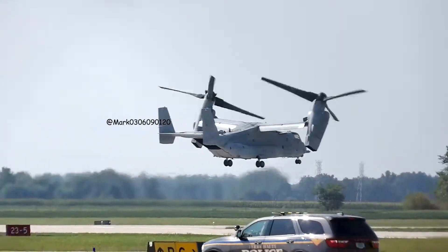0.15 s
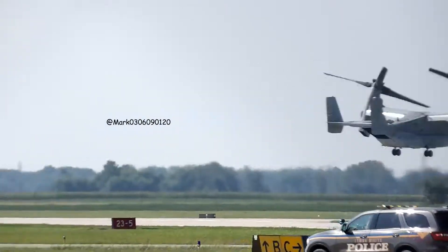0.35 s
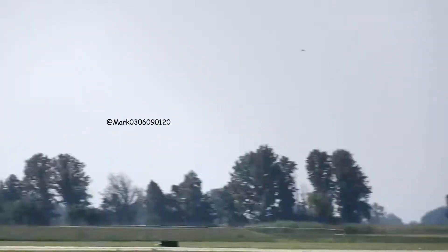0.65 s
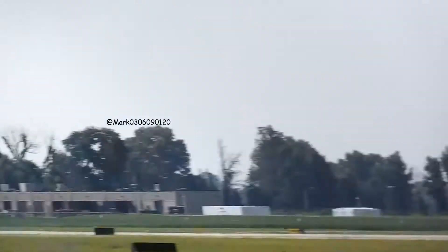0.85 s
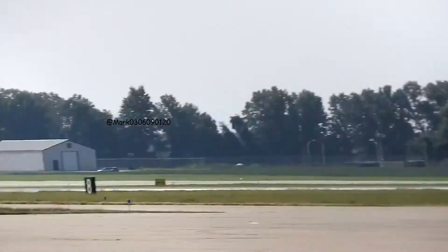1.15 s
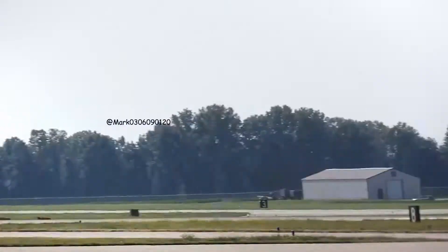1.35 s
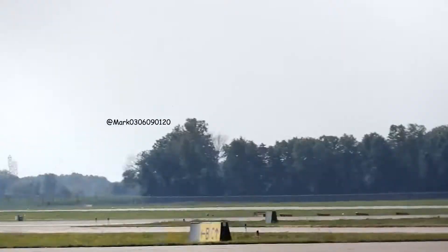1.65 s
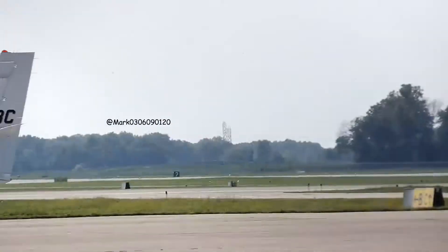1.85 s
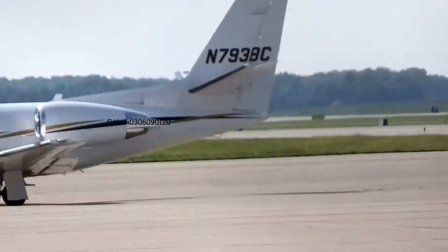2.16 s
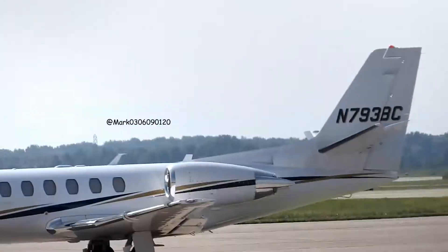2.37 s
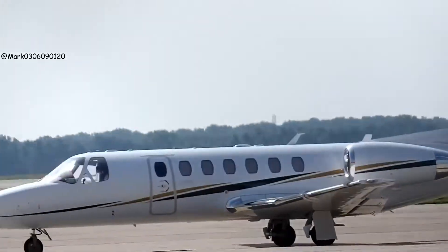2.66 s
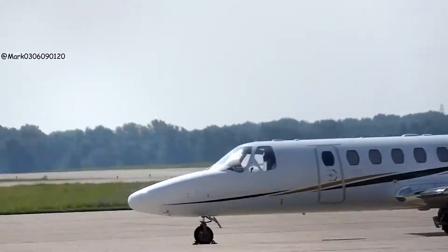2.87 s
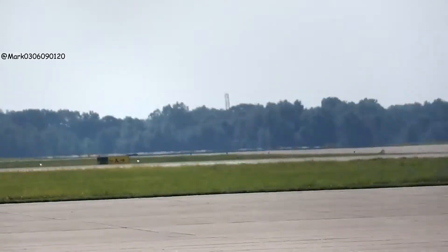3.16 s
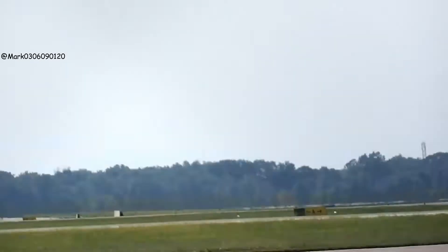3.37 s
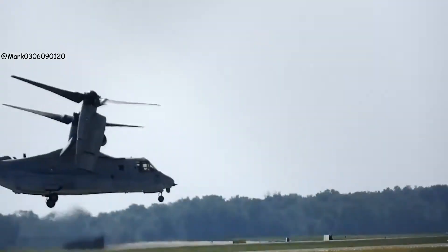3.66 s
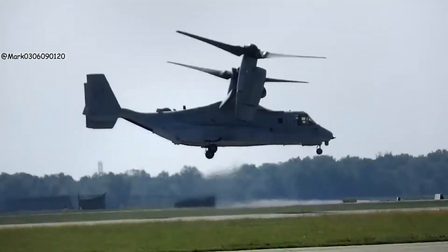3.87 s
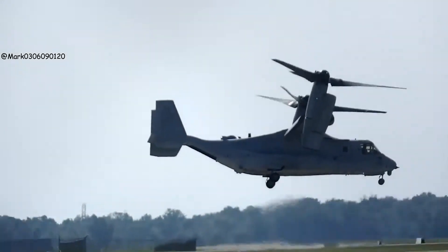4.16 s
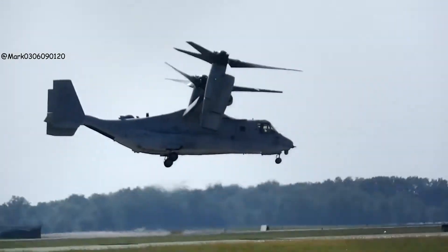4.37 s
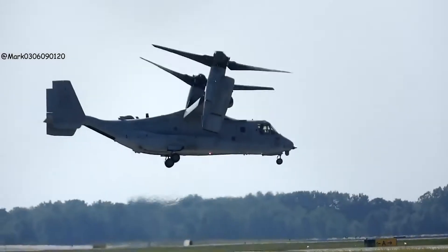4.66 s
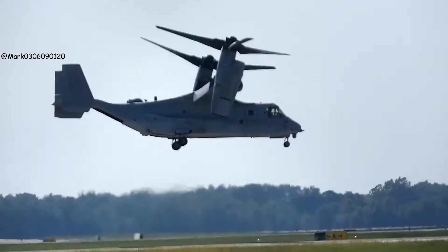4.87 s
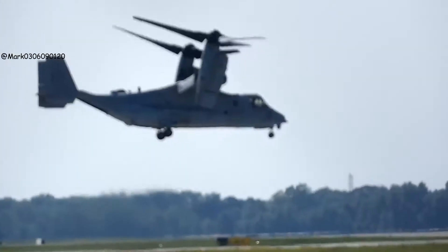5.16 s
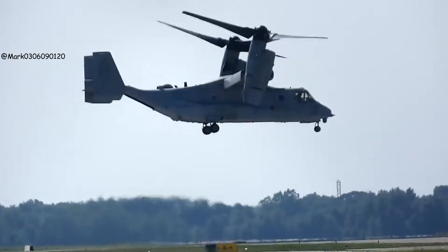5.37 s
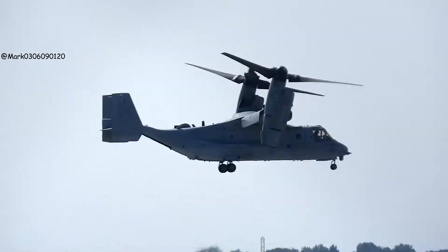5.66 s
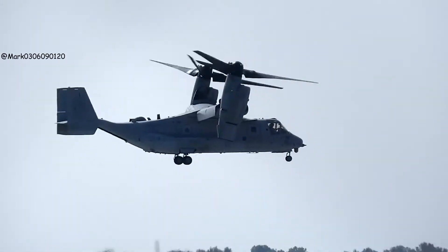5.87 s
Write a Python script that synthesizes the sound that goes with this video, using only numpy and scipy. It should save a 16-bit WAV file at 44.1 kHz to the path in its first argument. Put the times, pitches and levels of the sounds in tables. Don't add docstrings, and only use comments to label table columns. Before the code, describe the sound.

Wind buffets an open microphone, then a large tiltrotor's roar builds into hard, overloading blade slaps before easing to a steadier rushing roar.

```python
import sys
import numpy as np
from scipy import signal
from scipy.fft import rfft, irfft
from scipy.io import wavfile
from scipy.ndimage import uniform_filter1d

SR = 44100
rng = np.random.default_rng(int(sys.argv[2]) if len(sys.argv) > 2 else 0)


def store_wav(level_fs):
    pcm = np.round(np.clip(np.atleast_2d(level_fs), -1, 1) * 32767)
    wavfile.write(sys.argv[1], SR, pcm.T.astype(np.int16))


def natural_amplitude(level_db):
    exponent = np.asarray(level_db, float) / 20
    return 10 ** exponent


N = 265482
TIME = np.arange(N) / SR
FREQ = np.fft.rfftfreq(N, 1 / SR) + 1


def aircraft():
    # [t/s, low roar/dB, bright rush minus roar/dB, throb depth 0-1]
    flight = [(0.0, -31, -11.5, 0), (0.3, -37.5, -12.5, 0.1), (0.65, -32.5, -16, 0.7), (1, -35.5, -13, 0.2),
              (1.352, -37, -14, 0), (1.601, -33.5, -14.5, 0.2), (1.851, -36.5, -10.5, 0.5),
              (2.148, -32, -12.5, 0.6), (2.599, -32.5, -7.5, 0.23), (2.999, -30, -12, 0.75),
              (3.403, -27.5, -11, 0.5), (3.749, -28.5, -4.5, 0.8), (4.101, -32, -3.5, 0.4),
              (4.352, -29.5, -8, 0.3), (4.6, -34, -2.5, 0.8), (5.049, -27.5, -8.5, 0),
              (5.551, -29.5, -7, 0.21), (6.02, -32, -6, 0.1)]
    # [t/s, thump/dB, crack/dB]
    slaps = [(0.443, -34, -35.5), (0.573, -16.5, -61), (0.667, -25, -46), (1.51, -42, -32.5),
             (1.949, -25.5, -40), (1.997, -22, -40), (2.203, -33.5, -30.5), (2.497, -42, -27),
             (2.592, -22.5, -25), (2.925, -31.5, -28.5), (3.3105, -15.5, -19), (3.359, -6.5, -18.5),
             (3.409, -9.5, -17), (3.459, -11, -23.5), (3.509, -11.5, -13.5), (3.624, -19.5, -21),
             (3.673, -14, -24.5), (3.7205, -18.5, -18), (3.768, -25, -19.5), (3.816, -17, -23.5),
             (3.863, -14.5, -19), (3.915, -17.5, -22.5), (3.961, -32.5, -23.5), (4.141, -12, -27.5),
             (4.287, -11, -33.5), (4.338, -15, -36), (4.435, -16.5, -39), (4.828, -20.5, -22.5),
             (4.881, -18, -26.5), (5.022, -18, -60), (2.044, -27, -38), (2.098, -23, -43),
             (2.148, -29.5, -32.5), (2.29, -20.5, -48), (2.341, -20, -46), (2.392, -20, -47.5),
             (2.442, -39.5, -35), (2.642, -23, -31.5), (2.978, -18, -43), (3.025, -28, -44),
             (3.112, -18.5, -40.5), (3.17, -19, -39), (3.223, -32.5, -29.5), (3.262, -21.5, -34.5),
             (3.558, -28, -29.5), (4.012, -19.5, -27), (4.048, -17.5, -29.5), (4.095, -24, -29),
             (4.191, -13.5, -33), (4.239, -18.5, -36.5), (4.39, -23.5, -38), (4.572, -28, -32.5)]
    # [t/s, thump/dB, crack/dB]
    far_slaps = [(2.853, -20, -40), (2.908, -21.5, -42.5), (3.062, -19, -34), (3.131, -21, -31),
                 (3.576, -24, -28.5), (4.065, -25.5, -27.5), (4.31, -19, -33.5), (4.408, -19, -39),
                 (3.3545, -13, -14), (3.4145, -18, -31), (3.4775, -24, -37), (3.502, -23.5, -19.5),
                 (3.608, -14.5, -32.5), (3.619, -22, -20.5), (3.63, -11.5, -34.5), (3.709, -23, -33),
                 (3.757, -22, -24.5), (3.852, -19.5, -36)]
    # [t/s, level/dB]
    intake_whine = [
        (0, -70.5),
        (1, -70.5),
        (1.8, -67.5),
        (2.5, -64.5),
        (3.2, -63),
        (3.8, -63),
        (4.5, -63),
        (5.3, -64),
        (6.02, -65.5),
    ]
    # [f/Hz, density/dB per Hz]
    colour = [(100, -50), (260, -9.5), (400, -8), (445, -3.5), (520, -8.5), (620, -2.5), (700, 0.5),
              (820, -2.5), (950, -5.5), (1500, -7), (2100, -4), (2600, -4), (3100, -15), (4600, -29),
              (5300, -38), (7300, -41.5), (8500, -48)]
    exhaust_db, exhaust_follows, usual_rush_db = -45, 0.45, -42
    first_exhaust_db, first_gone_s = 3, 1
    flicker_db = 0.7

    s, *columns = np.transpose(flight)
    roar_db, rush_db, depth = (np.interp(TIME, s, column) for column in columns)
    rush_db = roar_db + rush_db
    depth = np.clip(depth, 0, 1)
    near_slaps = sorted(slaps)
    turns = blade_turns(np.transpose(near_slaps)[0])
    when, thump_db, crack_db = np.vstack([near_slaps, far_slaps]).T

    passes = natural_amplitude(2 * rng.standard_normal((200, 2)))[np.floor(turns).astype(int)].T
    phase = turns % 1
    beat = 2.86 * (1 - np.exp(-(phase / 0.16) ** 2)) * np.exp(-phase / 0.14)

    roar = natural_amplitude(roar_db + 7.5 + flicker_db * walk(7.3) + 0.18 * walk(59))
    roar = roar * (1 + 2.16 * (depth + 0.063) * beat * passes[0])
    roar = np.hypot(roar, bursts(when + 0.00071, thump_db + 2.0, rise_ms=1.7, fall_ms=4.9))

    rush = natural_amplitude(rush_db + 12.5 + 0.31 * flicker_db * walk(8) + 0.89 * walk(60))
    rush = rush * (1 + 1.35 * (depth + 0.17) * beat * passes[1])
    rush = np.hypot(rush, bursts(when, crack_db + 12.5, rise_ms=1.4, fall_ms=1.2))

    hiss_db = exhaust_db + exhaust_follows * (rush_db - usual_rush_db)
    hiss_db = hiss_db + first_exhaust_db * np.clip(1 - (TIME / first_gone_s) ** 2, 0, 1)
    intake_db = np.interp(TIME, *np.transpose(intake_whine))
    hiss, intake = (natural_amplitude(db + 9.0 + 0.89 * walk(24)) * (1 + 2.2 * depth * beat) for db in (hiss_db, intake_db))
    hiss = np.hypot(hiss, bursts(when, crack_db + 0.5, rise_ms=1.3, fall_ms=1.5))

    levels = roar, rush, hiss, intake
    bands = parts(colour)
    direct, scattered = (sum(shape(level * noise, band) for level, noise, band in zip(levels, noises, bands))
                         for noises in rng.standard_normal((2, 4, N)))
    direct = direct + slap_rings(when, thump_db, crack_db)
    thud = unit(np.exp(-(np.log(FREQ / 240) / 0.45) ** 2))
    direct = direct + shape(natural_amplitude(roar_db - 2) * beat * passes[0] * rng.standard_normal(N), thud)

    push = bursts(when, 1.68 * thump_db - 19.5, rise_ms=4.1, fall_ms=4.1)
    right = direct + shape(push, FREQ / (FREQ + 15))
    return np.array([body_shadow(direct, scattered), right])


def blade_turns(when):
    blade_hz = 20.3
    passed = np.cumsum(np.maximum(np.round(blade_hz * np.diff(when, prepend=0)), 1))
    return blade_hz * TIME + 2 + np.interp(TIME, when, passed - blade_hz * when) + 0.21


def slap_rings(when, thump_db, crack_db):
    low = chirps(when - 0.0026, thump_db + 4.5, 1342, 718, sink_ms=1.54, rise_ms=3.0, hold_ms=8.0)
    high = chirps(when - 0.0019, crack_db + 9.0, 2650, 2000, sink_ms=1.95, rise_ms=2.1, hold_ms=3.5)
    edge = chirps(when - 0.0015, 1.88 * crack_db + 11.0, 5470, 3600, sink_ms=1.3, rise_ms=0.53, hold_ms=1.3)
    return low + high + edge


def body_shadow(direct, scattered):
    # [f/Hz, level/dB, phase/rad, likeness 0-1]
    left_port = [(100.0, 11.5, 0.6, 0.01), (168, -2, -1, 0.3), (272, -4.5, -0.57, 1),
                 (430, -7.5, -0.94, 0.95), (680, -9, -0.72, 0.89), (920, -13, -2.3, .95),
                 (1140, -12, -0.068, .95), (1600, -22.5, -1.5, 0.4), (1870, -24.5, -0.88, 1),
                 (2730, -17, -0.18, 1), (3350, -9, -0.24, .93), (3720, -33.5, -2.3, 0.1),
                 (4330, -36.5, -0.27, 0.8), (5600, -43, -1.1, 0.15), (8500.0, -24, -0.1, 0.12)]
    like = np.clip(1.014 * along(left_port, column=3), 0, 1)
    shadow = natural_amplitude(along(left_port)) / (1 + (FREQ / 6510) ** 6)
    left = shape(direct, shadow * like * np.exp(1j * along(left_port, column=2)))
    return left + shape(scattered, shadow * np.sqrt(1 - like ** 2))


def breeze():
    # [t/s, level/dB]
    wind = [(0.0, -33), (0.149, -16.5), (0.401, -19.5), (0.62, -29.5), (0.8, -18), (1.1, -22.5),
            (1.299, -14), (1.46, -16), (1.618, -17), (1.752, -24.5), (1.899, -20), (2.4, -33), (2.901, -30),
            (3.5, -23.5), (4.5, -19.5), (5.5, -35), (5.68, -10), (5.792, -27), (5.9, -21), (6.02, -22.5)]
    # [t/s, level/dB, treble share/dB, length/ms]
    eddies = [(0.130, -9.5, -17, 6.4), (0.141, -13, -18.5, 7.8), (0.167, -12, -14.5, 7.5),
              (0.183, 1.5, -15, 6.1), (0.252, -13.5, -8, 5), (0.26, -7.5, -9.5, 5.78),
              (0.3255, -9.5, -15, 5.6), (0.448, -14.5, -21, 7), (0.461, -6, -21, 6.7),
              (0.474, -15.5, -11.5, 2.4), (0.5425, -6, -18, 5), (0.5525, -7, -16, 11),
              (0.5735, -9, -22, 2.3), (0.607, -13.5, -17, 5.6), (0.666, -14, -24, 7.1),
              (0.7185, -13.5, -18, 4.1), (0.732, -11, -20.5, 4), (0.7635, -9.5, -17.5, 5.1),
              (0.785, -9.5, -11, 5.77), (0.8035, -12.5, -18.5, 4.5), (0.815, -12.5, -20, 5.5),
              (0.8255, -8, -16.5, 7.15), (0.885, -12, -23, 6.7), (1.0485, -4.5, -16, 4.9),
              (1.061, -13, -12, 2.6), (1.0735, -11.5, -4.5, 8.4), (1.088, -8.5, -17, 6.6),
              (1.11, -11.5, -15, 10), (1.1365, -12.5, -12.5, 4.2), (1.1845, -7.5, -16, 6.8),
              (1.201, -4.5, -14, 4.7), (1.231, -18, -4.5, 9.7), (1.2775, -9, -25, 4.5),
              (1.3135, -10.5, -16.5, 3.5), (1.377, -16, -11, 7), (1.419, -11.5, -15.5, 5.8),
              (1.4395, -10, -17.5, 4.1), (1.4485, -8, -13.5, 6.9), (1.4895, -11, -12, 5.7),
              (1.503, -8.5, -11, 5.5), (1.6575, -10, -16, 5.2), (1.913, -8.5, -21.5, 4.6),
              (2.765, -7, -19.5, 4.2), (3.368, -4.5, -8, 7), (5.877, -8, -14.5, 3.7),
              (5.933, -9.5, -14, 5.2)]
    # [t/s, level/dB, treble share/dB, length/ms, ring f/Hz]
    gust_eddies = [(0.5605, -12.5, -19.5, 4, 715), (0.567, -7.5, -29.5, 7.1, 670),
                   (0.595, -17, -12, 5.1, 750), (0.625, -21, -22, 6, 650), (0.682, -11, -26.5, 5.5, 650),
                   (0.711, -19.5, -22, 5.8, 680), (0.793, -14.5, -26, 4, 700), (1.117, -16, -13.5, 4, 900),
                   (1.215, -13.5, -17, 4, 800), (1.259, -15.5, -17.5, 5, 800), (1.29, -16, -20, 6, 800),
                   (1.325, -16, -18, 4, 700), (1.358, -14.5, -13, 4, 900), (1.386, -14.5, -18.5, 5, 750),
                   (1.408, -16, -17.5, 3, 800), (1.509, -8, -10, 4, 900), (1.527, -17.5, -18.5, 4, 750),
                   (1.556, -16.5, -15, 4, 750), (1.595, -14, -19.5, 6, 850), (1.664, -9, -17.5, 3.5, 900),
                   (5.649, -14, -11, 5, 750), (5.658, -4.5, -18.5, 3.4, 850), (5.667, -14, -13.5, 6.3, 790),
                   (5.676, -12, -18.5, 3.4, 800), (5.6831, -7, -14.5, 5, 950),
                   (5.69, -6.5, -17.5, 6.1, 940), (5.696, -17, -24, 3, 700), (5.7039, -9.5, -13, 4, 940),
                   (5.709, -8, -12.5, 4, 970), (5.723, -12, -15.5, 5.3, 800), (5.738, -19, -13.5, 3.6, 850),
                   (5.746, -22, -14.5, 2.8, 800)]
    # [f/Hz, density/dB per Hz]
    cavity = [(60.0, -32), (130.0, -28.5), (250.0, -12.5), (450.0, -0.5), (700.0, 2), (1000.0, -1.5),
              (1400.0, -9), (2000.0, -14), (3000.0, -21.5), (4500.0, -36.5), (7000.0, -24)]
    port_ring_hz = 687

    s, db = np.transpose(wind)
    gust = np.sqrt(np.maximum(natural_amplitude(2 * np.interp(TIME, s, db)) - natural_amplitude(-68.0), 0))
    flutter = gust * natural_amplitude(2.33 * walk(90) + 1.6 * walk(7.23) - 6.0)
    plain = np.insert(np.vstack([eddies, small_eddies(s, db)]), 4, port_ring_hz, axis=1)
    when, pop_db, treble_db, ms, ring_hz = np.vstack([plain, gust_eddies]).T

    ring_swell = bursts(when, pop_db - 15.0 + 1.26 * np.minimum(ms, 12.0), rise_ms=0.57 * ms, fall_ms=0.63 * ms)
    edge_swell = bursts(when, pop_db + treble_db, rise_ms=0.3 * ms, fall_ms=0.22 * ms)
    ring = np.hypot(flutter, ring_swell)
    edge = np.hypot(flutter * natural_amplitude(-12.0), edge_swell)
    low, high = parts(cavity)[:2]
    port = shape(ring * rng.standard_normal(N), low) + shape(edge * rng.standard_normal(N), high)

    short = np.clip(ms, 3.0, 7.0)
    top_hz = 950 + 4300 * natural_amplitude(treble_db)
    port = port + chirps(when - 0.000404 * short, pop_db - 0.6, top_hz, ring_hz,
                         sink_ms=1.74, rise_ms=0.96, hold_ms=1.38 * short)
    return port * np.array([[natural_amplitude(-36.0)], [1]])


def small_eddies(s, db):
    count = 70
    chance = rng.standard_normal((count, 4)).T
    when = (np.arange(count) + 0.5 + 0.3 * np.clip(chance[0], -1.5, 1.5)) * N / SR / count
    pop_db = np.interp(when, s, db) - 3 + 4 * np.tanh(chance[1])
    treble_db = -20.5 + 1.7 * np.tanh(chance[2])
    length_ms = 4 * natural_amplitude(2.7 * chance[3])
    return np.transpose([when, pop_db, treble_db, length_ms])


def amplifier_hiss():
    # [f/Hz, density/dB per Hz]
    hiss_colour = [(2000, 8), (5000, -16), (7500, -16.5), (9500, -1), (11300, 3.5), (11750, -20.5),
                   (12200, 0.5), (15500, 4.5)]
    colour = unit(natural_amplitude(along(hiss_colour)) * (FREQ < 15800))
    return natural_amplitude(-72) * np.array([shape(x, colour) for x in rng.standard_normal((2, N))])


def unit(x):
    return x / np.sqrt(np.mean(x ** 2))


def along(table, column=1):
    rows = np.array(table)
    return np.interp(np.log(FREQ), np.log(rows[:, 0]), rows[:, column])


def shape(x, response):
    return irfft(rfft(x) * response, N)


def walk(rate):
    k = int(SR / rate)
    held = np.repeat(rng.standard_normal(N // k + 1), k)
    return unit(uniform_filter1d(uniform_filter1d(held, k), k)[:N])


def bursts(times, dbs, rise_ms, fall_ms):
    power = np.zeros(N)
    for s, db, rise, fall in np.broadcast(times, dbs, rise_ms, fall_ms):
        near = slice(max(int((s - 0.05) * SR), 0), int((s + 0.08) * SR))
        ms = 1000 * (TIME[near] - s)
        power[near] += natural_amplitude(2 * db) * np.where(ms < 0, np.exp(-(ms / rise) ** 2), np.exp(-ms / fall))
    return np.sqrt(power)


def parts(table):
    splits_hz = 1323, 3375, 5960
    gain = natural_amplitude(along(table)) / (1 + (table[0][0] / FREQ) ** 3) / (1 + (FREQ / table[-1][0]) ** 14)
    under = [0] + [1 / (1 + (FREQ / hz) ** 6) for hz in splits_hz] + [1]
    return [unit(gain * (b - a)) for a, b in zip(under, under[1:])]


def chirps(times, dbs, from_hz, to_hz, sink_ms, rise_ms, hold_ms):
    out = np.zeros(N)
    chance = rng.standard_normal((len(times), 2))
    packets = np.broadcast(times, dbs, from_hz, to_hz, sink_ms, hold_ms, *chance.T)
    for s, db, top, end, sink, hold, detune, phase in packets:
        start = int(s * SR)
        ms = 1000 * np.arange(min(int(0.04 * SR), N - start)) / SR
        hz = (end + (top - end) * np.exp(-ms / sink)) * (1 + 0.07 * detune)
        swell = np.sin(np.pi / 2 * np.minimum(ms / rise_ms, 1)) ** 2 * np.exp(-(ms / hold) ** 3)
        out[start:start + len(ms)] += natural_amplitude(db) * swell * np.sin(2 * np.pi * (np.cumsum(hz) / SR + phase))
    return out


def scene():
    return aircraft() + breeze()


def band_limit(x):
    return signal.sosfilt(signal.butter(12, 15800, fs=SR, output="sos"), x)


def record(dry):
    mix = np.clip(dry + amplifier_hiss(), -0.99, 0.99)
    mix = mix * np.clip(TIME[::-1] / 0.006, 0, 1)
    return band_limit(mix)


dry = scene()
out = record(dry)
store_wav(out)
```